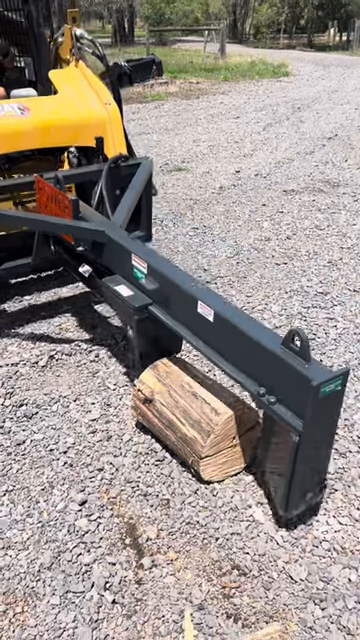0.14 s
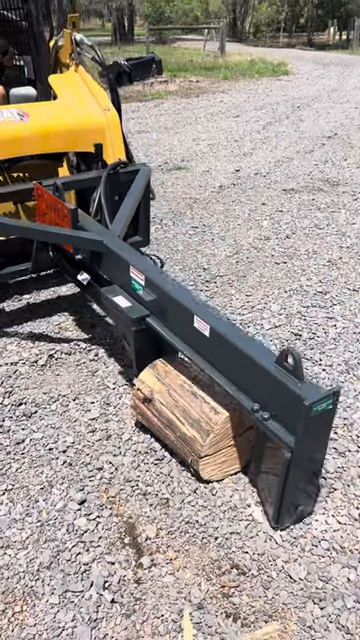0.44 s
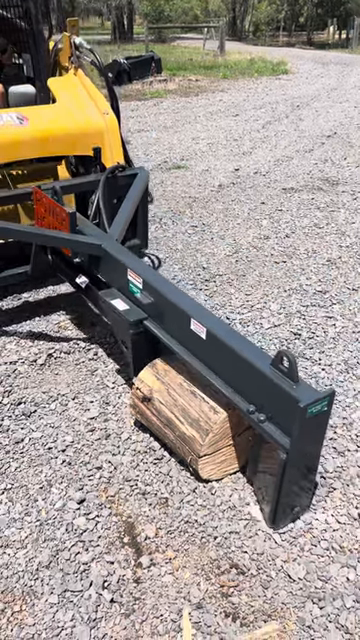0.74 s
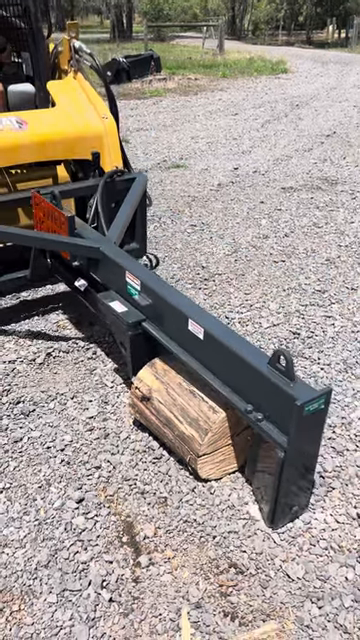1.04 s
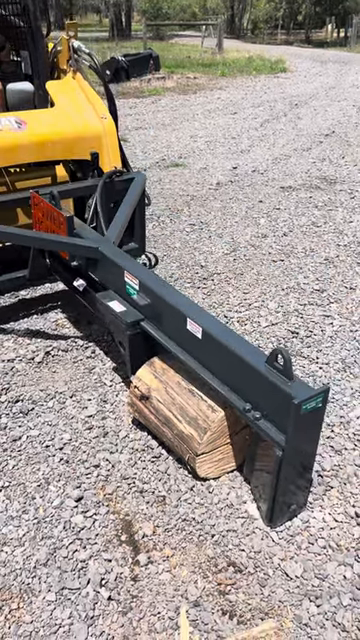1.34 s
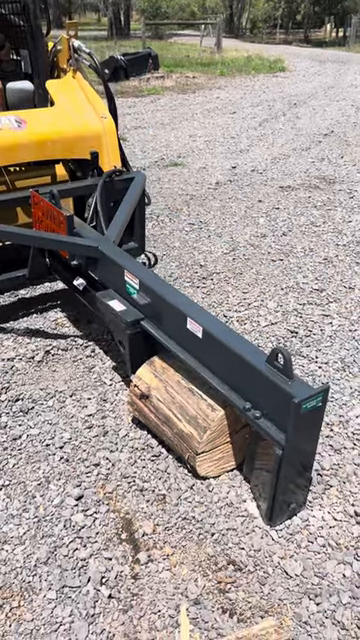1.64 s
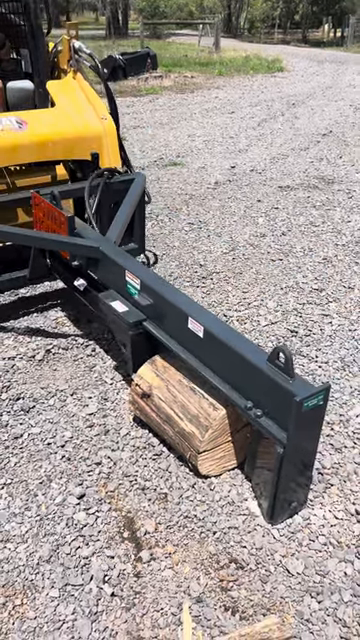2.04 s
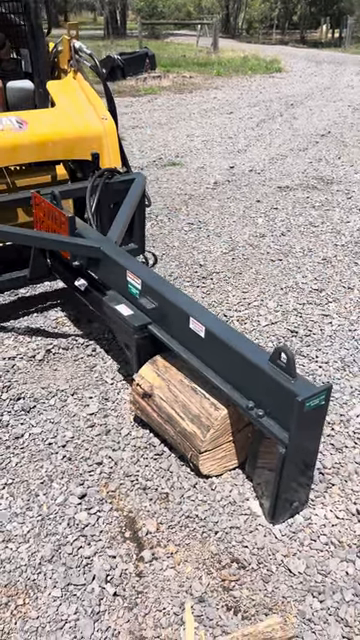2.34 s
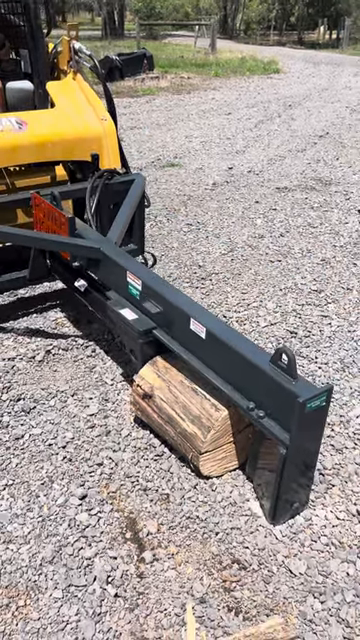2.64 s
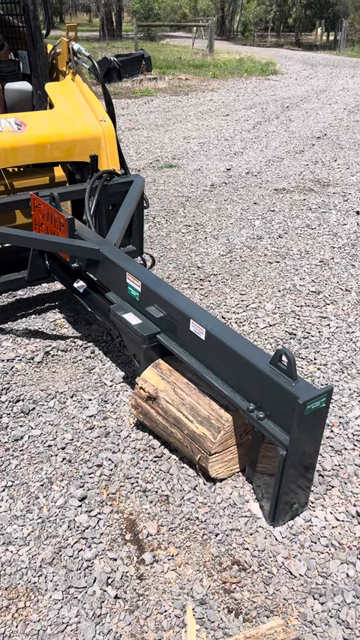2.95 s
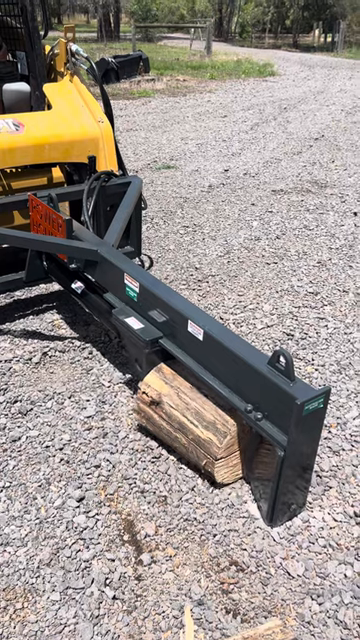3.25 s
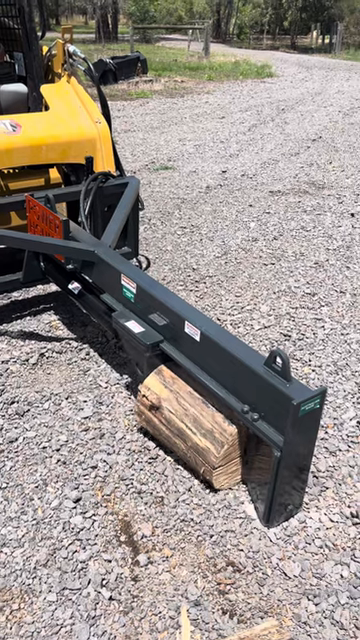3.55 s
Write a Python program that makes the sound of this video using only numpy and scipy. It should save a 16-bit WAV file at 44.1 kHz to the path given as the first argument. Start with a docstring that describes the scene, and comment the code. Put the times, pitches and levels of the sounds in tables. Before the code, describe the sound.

Diesel engine rumbles and clatters, lugs under hydraulic load, then a log cracks and tears open

```python
"""Log splitter on a gravel lot

A skid steer's four-cylinder diesel, built from firing lines and clatter, drives a hydraulic log splitter.
The pump takes up load with a low thump: the engine lugs and the pump whines until the wood cracks.
The engine recovers, and the log finally tears open in a run of cracks made of bursts of random snaps.
A stone chip ticks now and then, as a click through a very high resonance.
Oil hiss, cooling air and a few puffs of wind are shaped noise; a microphone pair takes it all in."""
import sys
import numpy as np
from scipy import signal
from scipy.fft import rfft, irfft, next_fast_len
from scipy.io import wavfile

SR = 44100
rng = np.random.default_rng(int(sys.argv[2]) if len(sys.argv) > 2 else 0)


def bounce(signal):
    """Save signal as a 16-bit WAV file at the path given by the first command-line argument."""
    frames = np.transpose(np.atleast_2d(signal))
    limited = np.clip(frames, -1, 1)
    pcm = np.round(limited * 32767).astype(np.int16)
    wavfile.write(sys.argv[1], SR, pcm)


N = 162288
TIME = np.arange(N) / SR
SIZE = next_fast_len(N + 8192)  # transform length, with room for filter tails
FREQS = np.maximum(np.arange(SIZE // 2 + 1) * SR / SIZE, 1)

# Engine speed. Each row: time in seconds, firings per second in Hz.
FIRING_RATE = [(0, 81.62), (1.16, 81.93), (1.31, 75.26), (1.58, 77.36), (1.89, 76.46), (2.0, 82),
               (2.2, 81.9), (3.68, 81.35)]
# Hydraulic load on the engine. Each row: time in seconds, share from 0 to 1.
HYDRAULIC_LOAD = [(1.16, 0.08), (1.33, 0.79), (1.9, 0.88), (2.03, 0.09)]
# Exhaust lines. Each row: multiple of the firing rate, level in dB running free, level in dB under load.
EXHAUST_LINES = [(1, -12, -9), (2, -24.5, -13.5), (3, -40, -35.5)]
# Shaking block and panels. Each row: multiple of the firing rate, dB running free, dB under load.
BLOCK_LINES = [(1.25, -37.5, -55), (1.5, -37.5, -47.5), (1.75, -39.5, -45), (2.5, -53.5, -50.5),
               (3.5, -37.5, -40), (6, -38.5, -47.5), (7, -46.5, -48), (15, -53.5, -58.5)]
# Combustion clatter spectrum. Each row: frequency in Hz, level in dB per Hz.
CLATTER_SPECTRUM = [(25, -67.5), (60, -54), (290, -59), (400, -63.5), (520, -65.5), (720, -66.5),
                    (1250, -73.5), (3000, -83.5), (3700, -89), (13000, -106)]
# Knock strength of the cylinders in firing order. Each entry: level in dB.
CYLINDER_LEVELS = [0.029, -0.42, 0.21, -0.93]
# Pump tone. Each row: time in seconds, level in dB.
PUMP_LEVEL = [(1.14, -48.5), (1.17, -29), (1.28, -34.5), (1.37, -30), (1.88, -30), (1.96, -47.5),
              (2.07, -38.5), (2.14, -30)]
# Pump overtones at full pressure. Each row: multiple of the pump tone, level in dB.
PUMP_OVERTONES = [(2, -48.5), (3, -49.5), (4, -45), (6, -53)]
# How far the pump is at full pressure. Each row: time in seconds, share from 0 to 1.
PRESSURE_SHARE = [(1.44, 0.04), (1.49, 0.88), (1.86, 0.84), (1.92, 0.05)]
# Oil squeezed through the valve at full load. Each row: frequency in Hz, level in dB per Hz.
VALVE_SPECTRUM = [(3000, -100), (5600, -89.5), (7400, -99), (8600, -77.5), (9800, -104), (15000, -108)]
# Valve whistle. Each row: time in seconds, level in dB.
WHISTLE_LEVEL = [(0, -61.5), (1.15, -64), (1.3, -84.5), (2.2, -67), (2.6, -68.5)]
# Cracks of the log, and at 1.159 s the low thump of the pump taking up load. Each row: start in seconds,
# thud pitch in Hz, thud level in dB, woody ring in dB, splinters in dB, decay in seconds.
CRACKS_AND_THUMP = [(0.692, 690, -48.5, -60.5, -33, 0.0057), (1.159, 457, -25.5, -48, -60, 0.023),
                    (1.982, 904, -38.5, -36, -27, .011), (2, 618, -16.5, -26.5, -34, 0.022),
                    (2.056, 1321, -40, -39.5, -27, 0.0054), (3.5065, 1290, -15, -14, -54, .016),
                    (3.525, 1890, -24, -20, -47, 0.01), (3.547, 1306, -26.5, -45, -30.5, 0.037),
                    (3.5834, 900, -14, -17.5, -21, .012), (3.5933, 3680, -27.5, -32.5, -12, .003),
                    (3.606, 590, -15.5, -32, -24.5, .006), (3.619, 654, -13.5, -19, -22.5, 0.0076),
                    (3.631, 870, -13.5, -18.5, -21.5, 0.0077), (3.646, 328, -14.5, -16.5, -19, .012),
                    (3.666, 1060, -17.5, -22, -29.5, 0.019)]
# Fibres rub and tear. Each row: start in seconds, length in seconds, thud pitch in Hz, thud level in dB,
# woody ring in dB, splinters in dB.
FIBRE_TEARS = [(0.511, .045, 600, -45, -43.5, -37.5), (2.01, 0.14, 666, -34.5, -35.5, -38.5),
               (3.565, 0.039, 793, -40.5, -28, -29), (3.595, 0.1, 395, -24, -25, -30)]
# Shape of the woody ring. Each row: frequency in Hz, relative level in dB.
WOOD_SPECTRUM = [(300, -14.5), (900, -12), (1150, -3), (1500, -4.5), (1680, -13), (2300, -10.5),
                 (2700, -20), (3700, -18.5), (5000, -39), (12000, -58.5)]
# Shape of the splinter sound. Each row: frequency in Hz, relative level in dB.
SPLINTER_SPECTRUM = [(800, -5), (3000, 12), (5800, 3.5), (8000, 2), (10500, -5.5), (15000, -3.5)]
# Resonances of the steel beam. Each row: frequency in Hz, relative level in dB, 60 dB decay in seconds.
BEAM_MODES = [(1222, -2, .2), (1301, 1.5, .25), (1389, 0, .13), (1486, -2.5, .14), (1873, -5, .14),
              (2326, -8, .13)]
# Stone chips: single very high ticks. Each row: start in seconds, level in dB of the click that rings.
STONE_TICKS = [(.7175, -24), (3.452, -39)]
# Cooling fan and flowing oil. Each row: frequency in Hz, level in dB per Hz.
FAN_SPECTRUM = [(100, -71.5), (2400, -83), (4200, -88.5), (6500, -97.5), (8400, -86.5), (10000, -101),
                (13000, -96), (15500, -103)]
# Puffs of wind. Each row: start in seconds, length in seconds, level in dB.
WIND_PUFFS = [(2.14, 0.079, -20.5), (2.229, .19, -22)]
# Shape of the wind rumble. Each row: frequency in Hz, relative level in dB.
WIND_SPECTRUM = [(20, -16), (50, 2), (280, -12), (1000, -73)]
# Microphone pair. Each row: frequency in Hz, phase in radians by which the left leads.
PAIR_PHASE = [(80, -.06), (160, -.17), (260, -.35), (450, -1.45), (1250, -1.5), (1650, -.2), (2200, .9),
              (2700, 2.5), (5000, 2.1), (6200, 3.3), (10000, 9.4), (15500, 16.8)]
# Microphone pair. Each row: frequency in Hz, left minus right in dB.
PAIR_BALANCE = [(80, .5), (200, 1), (370, 3), (560, -3.5), (1000, -5), (1700, -.7), (8000, .6)]
# Sound scattered by gravel and machine. Each row: frequency in Hz, level in dB against the direct sound.
SCATTER_LEVEL = [(100, -57), (350, -8), (700, 1.5), (2500, 5.5), (8000, 0)]

EXHAUST_WAVER, BLOCK_WAVER, WAVER_HZ = .015, .25, 5  # wavers relative to each line; exhaust per multiple
REPEATING = .35  # share of the rattle's power that is alike in every cycle
KNOCK_DECAY, KNOCK_FLOOR, KNOCK_TOP_HZ = .3, .4, 1300  # decay in firing intervals
PUMP_ORDER, PUMP_FLUTTER_RAD = 5, .04  # pump tone as a multiple of the firing rate
WHISTLE_HZ, WHISTLE_WIDTH_HZ = 8700, 58
FIBRES_PER_S, FIBRE_SPREAD_DB = 8000, 3
CRACK_ATTACK_S, SNAP_S = .0025, .00005
THUD_CYCLES = 5.8  # cycles until a thud has died by 60 dB
RAGGED_DB, RAGGED_HZ = 2.5, 50
BEAM_DB = -6.5  # against the woody sound
TICK_HZ, TICK_T60_S = 12500, .002
FAN_DIFFUSE = .35  # share of the fan's power that arrives from all sides
LOG_SCATTER_DB, SCATTER_DECAY_S = -11, .035
CUTOFF_HZ = 15800


def from_db(db):
    """Decibels to gain."""
    return 10 ** (np.asarray(db) / 20)


def rms_one(x):
    """Scale to unit power."""
    return x / np.sqrt(np.mean(x ** 2) + 1e-20)


def in_time(rows):
    """A control curve at every sample."""
    return np.interp(TIME, *np.transpose(rows))


def over_hz(points):
    """A table joined by straight lines over log frequency."""
    hz, value = np.transpose(points)
    return np.interp(np.log(FREQS), np.log(hz), value)


def colour(x, points, keep_power=False):
    """Causal filter: unit white noise comes out at the table's dB per Hz, or keeps its power."""
    gain = from_db(over_hz(points))
    gain = rms_one(gain) if keep_power else gain * np.sqrt(SR / 2)
    # folding the cepstrum onto positive times gives minimum phase
    cepstrum = irfft(np.log(gain))[:SIZE // 2]
    cepstrum[1:] *= 2
    response = np.exp(rfft(cepstrum, SIZE))
    return irfft(rfft(x, SIZE) * response)[:N]


def drift(rate_hz):
    """Slow random wander of unit RMS."""
    spectrum = rfft(rng.standard_normal(SIZE)) / (1 + (FREQS / rate_hz) ** 2)
    return rms_one(irfft(spectrum)[:N])


def ring(x, hz, t60):
    """One resonance, a two-pole filter that dies by 60 dB in t60 seconds."""
    radius, turn = from_db(-60 / (t60 * SR)), 2 * np.pi * hz / SR
    feedback = [1, -2 * radius * np.cos(turn), radius ** 2]
    return signal.lfilter([0, np.sin(turn)], feedback, x + 1e-18)  # offset keeps the filter from denormals


def swell(start, length):
    """A rounded rise and fall."""
    return np.sin(np.pi * np.clip((TIME - start) / length, 0, 1))


def engine_lines(firings, load):
    """Exhaust pulses sharpen under load; unequal cylinders shake the block at quarter multiples."""
    out = np.zeros(N)
    for multiple, free_db, load_db in EXHAUST_LINES:
        level = from_db(free_db + (load_db - free_db) * load)
        waver = 1 + EXHAUST_WAVER * multiple * drift(WAVER_HZ)
        out -= level * waver * np.cos(2 * np.pi * multiple * firings)
    for multiple, free_db, load_db in BLOCK_LINES:
        angle = 2 * np.pi * (multiple * firings + rng.random())
        level = from_db(free_db + (load_db - free_db) * load)
        waver = BLOCK_WAVER * drift(WAVER_HZ) * np.cos(angle + 1)
        out += level * (np.cos(angle) + waver)
    return np.sqrt(2) * out


def clatter(firings):
    """Each firing sets off a short rattle, partly alike in every four-stroke cycle; its treble runs evenly."""
    count = len(CYLINDER_LEVELS)
    cycle_size = int(count * SR / FIRING_RATE[0][1])
    place_in_cycle = (firings / count % 1 * cycle_size).astype(int)
    alike = rng.standard_normal(cycle_size)[place_in_cycle]
    rattle = np.sqrt(REPEATING) * alike + np.sqrt(1 - REPEATING) * rng.standard_normal(N)
    strength = from_db(CYLINDER_LEVELS)[firings.astype(int) % count]
    knock = KNOCK_FLOOR + strength * np.exp(-(firings % 1) / KNOCK_DECAY)
    lowpass = signal.butter(2, KNOCK_TOP_HZ, fs=SR, output="sos")
    highpass = signal.butter(2, KNOCK_TOP_HZ, "high", fs=SR, output="sos")
    low = signal.sosfilt(lowpass, rms_one(rattle * knock))
    high = signal.sosfilt(highpass, rng.standard_normal(N))
    return colour(low + high, CLATTER_SPECTRUM)


def pump(firings):
    """The pump hums, and whines at full pressure; its flutter blurs the highest overtones most."""
    angle = 2 * np.pi * PUMP_ORDER * firings + PUMP_FLUTTER_RAD * drift(RAGGED_HZ)
    hum = from_db(in_time(PUMP_LEVEL)) * np.cos(angle)
    whine = np.zeros(N)
    for multiple, db in PUMP_OVERTONES:
        whine += from_db(db) * np.cos(multiple * angle + 2 * np.pi * rng.random())
    return np.sqrt(2) * (hum + whine * in_time(PRESSURE_SHARE))


def valve(load):
    """Oil hisses through the valve under load and whistles when it flows freely."""
    hiss = load * colour(rng.standard_normal(N), VALVE_SPECTRUM)
    t60 = np.log(1000) / np.pi / WHISTLE_WIDTH_HZ
    whistle = rms_one(ring(rng.standard_normal(N), WHISTLE_HZ, t60))
    return hiss + from_db(in_time(WHISTLE_LEVEL)) * whistle


def fibres():
    """Dense snaps of uneven size, at random moments and of either sign."""
    sizes = from_db(FIBRE_SPREAD_DB * np.minimum(rng.exponential(1, N), 4))
    breaks = rng.random(N) < FIBRES_PER_S / SR
    return rms_one(sizes * rng.choice([-1, 1], N) * breaks)


def thud(x, hz):
    """A struck or breaking piece rings for a few cycles at its own pitch; power is kept."""
    t60 = THUD_CYCLES / hz
    return ring(x, hz, t60) * np.sqrt(4 * np.log(1000) / (t60 * SR))


def splitting_log_and_thump():
    """Cracks, tears and the pump's thump: snaps heard as thud, woody ring and splinters; the beam rings."""
    power, snaps = np.zeros((2, 2, N))  # each holds woody ring and splinters
    thuds, grain = np.zeros(N), fibres()
    for start, hz, thud_db, *part_db, decay in CRACKS_AND_THUMP:
        age = np.maximum(TIME - start, 0)
        attack = np.minimum(age / CRACK_ATTACK_S, 1)
        shape = attack * np.exp(-np.maximum(age - CRACK_ATTACK_S, 0) / decay)
        # one sample at the end of the attack, with the energy of a snap SNAP_S long
        snap = np.sqrt(SNAP_S * SR) * (np.arange(N) == int((start + CRACK_ATTACK_S) * SR))
        power += np.outer(from_db(part_db), shape) ** 2
        snaps += np.outer(from_db(part_db), snap)
        thuds += from_db(thud_db) * thud(snap + shape * grain, hz)
    ragged = rms_one(from_db(RAGGED_DB * drift(RAGGED_HZ)))
    for start, length, hz, thud_db, *part_db in FIBRE_TEARS:
        shape = swell(start, length) * ragged
        power += np.outer(from_db(part_db), shape) ** 2
        thuds += from_db(thud_db) * thud(shape * grain, hz)
    wood_break, splinter_break = [snap + np.sqrt(p) * fibres() for snap, p in zip(snaps, power)]
    wood = colour(wood_break, WOOD_SPECTRUM, keep_power=True)
    splinters = colour(splinter_break, SPLINTER_SPECTRUM, keep_power=True)
    beam = sum(from_db(db) * rms_one(ring(wood, hz, t60)) for hz, db, t60 in BEAM_MODES)
    return thuds + wood + splinters + from_db(BEAM_DB) * wood.std() * rms_one(beam)


def stone_ticks():
    """A stone chip gives a single very high tick, a click through one short resonance."""
    clicks = sum(from_db(db) * (np.arange(N) == int(start * SR)) for start, db in STONE_TICKS)
    return ring(clicks, TICK_HZ, TICK_T60_S)


def fan():
    """Smooth rush of cooling air, partly direct and partly from all sides."""
    direct, left, right = [colour(white, FAN_SPECTRUM) for white in rng.standard_normal((3, N))]
    around = np.array([left, right])
    return np.sqrt(1 - FAN_DIFFUSE) * microphone_pair(direct) + np.sqrt(FAN_DIFFUSE) * around


def wind():
    """A few puffs rumble on the microphone, as low noise alike on both sides."""
    level = sum(from_db(db) * swell(start, length) for start, length, db in WIND_PUFFS)
    return level * colour(rng.standard_normal(N), WIND_SPECTRUM, keep_power=True)


def microphone_pair(x, scatter_db=-np.inf):
    """Direct sound reaches the two ports shifted in phase and level; scattered sound differs in each."""
    tail = rng.standard_normal((2, N)) * np.exp(-TIME / SCATTER_DECAY_S)
    tail /= np.sqrt(np.sum(tail ** 2, axis=1, keepdims=True))
    sides = np.array([[1], [-1]])  # left, right
    scatter = from_db(over_hz(SCATTER_LEVEL) + scatter_db)
    direct = np.exp(.5j * sides * over_hz(PAIR_PHASE))
    paths = (direct + scatter * rfft(tail, SIZE)) / np.sqrt(1 + scatter ** 2)
    balance = from_db(sides * over_hz(PAIR_BALANCE) / 2)
    return irfft(rfft(x, SIZE) * paths * balance)[:, :N]


def scene():
    """Engine speed and hydraulic load drive the machine; the log lies nearer and sounds drier."""
    firings = np.cumsum(in_time(FIRING_RATE)) / SR  # running count
    load = in_time(HYDRAULIC_LOAD)
    tones = microphone_pair(engine_lines(firings, load) + pump(firings))
    noises = microphone_pair(clatter(firings) + valve(load), 0)
    near = microphone_pair(splitting_log_and_thump() + stone_ticks(), LOG_SCATTER_DB)
    return tones + noises + near + fan() + wind()


def record(dry):
    """Peaks are clipped just below full scale, then a steep low-pass cuts the top."""
    lowpass = signal.ellip(12, .1, 90, CUTOFF_HZ, fs=SR, output="sos")
    return signal.sosfilt(lowpass, np.clip(dry, -.95, .95))


dry = scene()
out = record(dry)
bounce(out)
```